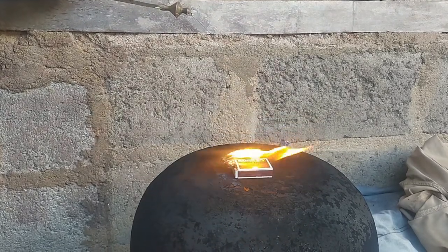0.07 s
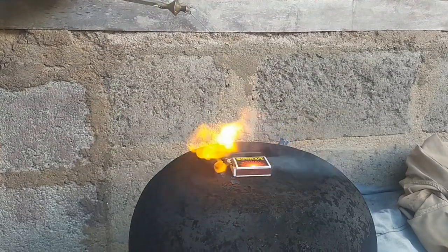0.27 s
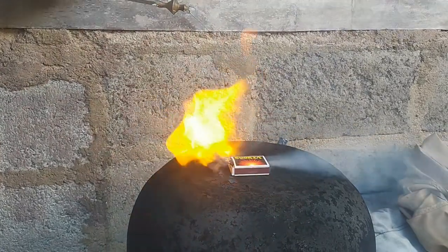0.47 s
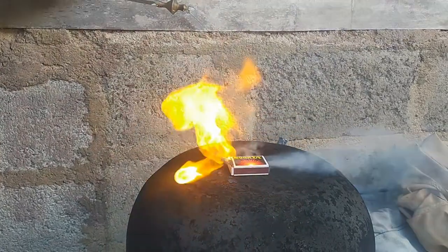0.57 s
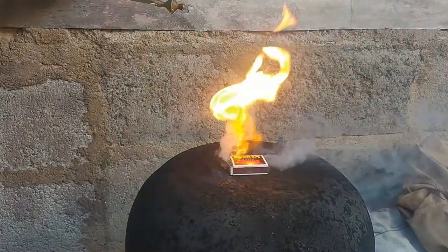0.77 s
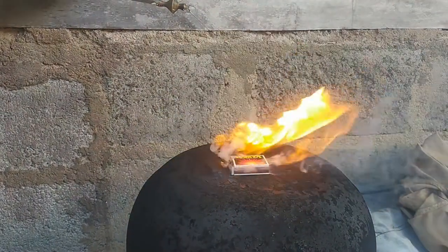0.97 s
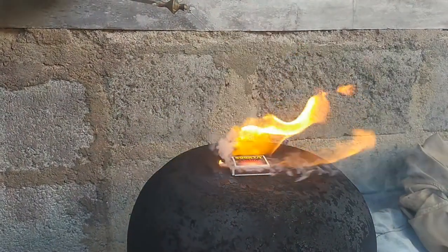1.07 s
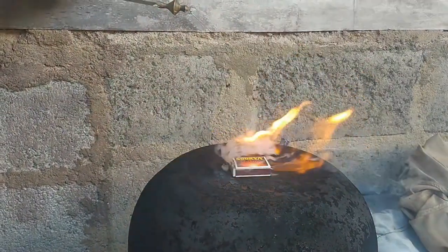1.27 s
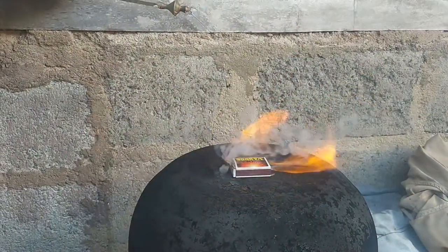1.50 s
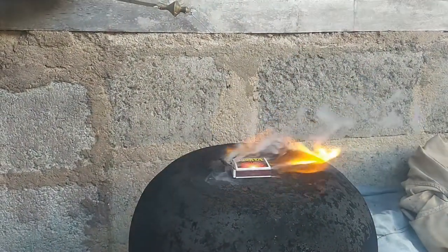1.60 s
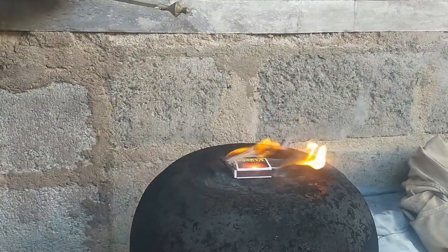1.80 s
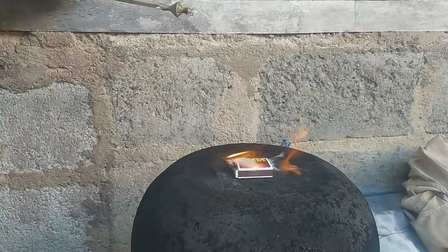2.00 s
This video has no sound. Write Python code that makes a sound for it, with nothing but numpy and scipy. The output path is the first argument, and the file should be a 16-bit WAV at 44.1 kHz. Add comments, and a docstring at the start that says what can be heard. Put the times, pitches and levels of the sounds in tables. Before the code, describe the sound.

A box of matches flares up with a hissing whoosh, then sputters and dies down.

```python
"""Outdoors, a box of matches flares up on an iron dome, close in front of a block wall.
A two-port stereo microphone hears the heads catch in a swelling hiss and rasp, hollowed by the
wall's quick echo. Near 0.4 s a jet of gas bursts out with a low roar of flame. From 1.4 s the
last heads sputter and spit as the fire sinks, and faint hums swell briefly in the distance."""
import sys
import numpy as np
from scipy import signal
from scipy.fft import rfft, irfft, next_fast_len
from scipy.io import wavfile
from scipy.ndimage import map_coordinates

SR = 44100
rng = np.random.default_rng(int(sys.argv[2]) if len(sys.argv) > 2 else 0)


def dump_mix(stems):
    """Bounce the given channels to the path in sys.argv[1] as a 16-bit WAV at rate SR."""
    frames = np.atleast_2d(stems).T  # one column per channel
    limited = np.clip(frames, -1, 1)  # hard clip at full scale
    pcm = np.round(limited * 32767).astype(np.int16)
    wavfile.write(sys.argv[1], SR, pcm)


N = 90404

# colour of match heads catching, in sputter and spits: frequency_hz, gain_db
HEAD_SPECTRUM = [(300, -45), (550, -14), (900, -9.5), (1350, -7.5), (1900, -4), (2250, -2), (2500, 1.5),
                 (2800, -4), (3050, -3.5), (3700, -3), (4300, 3), (5000, -2), (5700, 1), (6500, -3.5),
                 (9000, -10), (14000, -47)]
HEAD_WALL_GAIN = 0.33


def amp(db):
    """Decibels to gain."""
    return 10 ** (np.asarray(db) / 20)


def unit(x):
    """Scaled to rms 1."""
    return x / np.sqrt(np.mean(x ** 2) + 1e-20)


def along(points, hz):
    """Rows of frequency_hz, value, read at hz on a log axis."""
    frequencies, values = np.transpose(points)
    return np.interp(np.log(hz + 1), np.log(frequencies + 1), values)


def curve(rows):
    """Rows of time_s, value, as one value per sample."""
    return np.interp(np.arange(N) / SR, *np.transpose(rows))


def wobble(rate):
    """A smooth random curve, rate knots a second."""
    return map_coordinates(rng.standard_normal(4096), [np.arange(N) * rate / SR], mode="wrap")


def filtered(x, response):
    """x through a complex response, given as a function of Hz."""
    size = next_fast_len(N + SR // 2)
    return irfft(rfft(x, size) * response(np.fft.rfftfreq(size, 1 / SR)), size)[..., :N]


def swept(x, centre, gain_db):
    """A moving filter, gain_db of the offset in Hz from a gliding centre; the mono mix has rms 1."""
    hz, t, frames = signal.stft(x, SR, nperseg=512)
    offset = hz[:, None] - np.interp(t, *np.transpose(centre))
    pair = signal.istft(frames * amp(gain_db(offset)), SR, nperseg=512)[1][:, :N]
    return pair / pair.mean(axis=0).std()


def turbulence():
    """Two unrelated white noises."""
    return rng.standard_normal((2, N))


def crackle(rate, share):
    """Turbulence with tiny pops, rate a second, that carry a share of its power."""
    pops = (rng.random(N) < rate / SR) * rng.standard_normal((2, N))
    return np.sqrt(share) * unit(pops) + np.sqrt(1 - share) * turbulence()


def at_microphone(drive, spectrum, wall_gain=0):
    """Noise coloured, joined by the wall's echo and spread over both ports; the mono mix has rms 1."""
    # how alike the two ports sound: frequency_hz, coherence
    likeness = [(30, 0.43), (70, 1), (150, 0.98), (550, 0.95), (1000, 0.74), (2500, 0.94), (4100, 1),
                (4800, 0.43), (8000, 0.55), (10000, 0.19), (14000, 0.077)]
    # level between the ports: frequency_hz, left_minus_right_db
    balance = [(100, -0.5), (800, -0.5), (1300, -4), (1900, -6), (2550, -9.5), (3050, -11.5), (3600, 2),
               (4300, -2.5), (5100, -10), (5600, -15), (6200, 4), (6900, -9), (7700, -12), (8500, -14.5),
               (9300, -19), (9900, -7), (10600, -2), (12000, -2), (12700, -4), (15000, 1)]
    # phase between the ports: frequency_hz, left_lead_rad
    lead = [(100, 0.26), (500, 0.18), (1200, 0.5), (2400, -1.8), (3200, 1.2), (4500, -1.6), (5500, 1),
            (7200, -2.5), (8500, -1.7), (9800, 4), (11500, 3.5)]
    wall_delay_s, wall_dull_hz = 0.0015956, 6860
    half = np.array([[.5], [-.5]])

    def mid_and_side(hz):
        bounce = wall_gain / (1 + (hz / wall_dull_hz) ** 6)  # rough blocks scatter the treble
        echo = 1 + bounce * np.exp(-2j * np.pi * hz * wall_delay_s)
        spread = np.arccos(np.clip(along(likeness, hz), -1, 1)) / 2
        return amp(along(spectrum, hz)) * echo * np.array([np.cos(spread), np.sin(spread)])

    def ports(hz):
        return amp(half * along(balance, hz)) * np.exp(1j * half * along(lead, hz))

    mid, side = filtered(drive, mid_and_side)
    pair = filtered(np.array([mid + side, mid - side]), ports)
    return pair / pair.mean(axis=0).std()


def yard(x, share=0.42, span_s=.022):
    """Adds weak early reflections from small things nearby, which return little bass."""
    delays_s = rng.uniform(.004, span_s, size=12)
    gains = unit(rng.standard_normal(size=12))
    taps = np.bincount((delays_s * SR).astype(int), gains / np.sqrt(len(gains)))
    treble = filtered(x, lambda hz: hz / np.hypot(hz, 1110))
    return x + share * signal.fftconvolve(treble, taps)[:N]


def air():
    """Quiet outdoor air around the microphone."""
    # colour of the background: frequency_hz, gain_db
    spectrum = [(20, 12.5), (60, -5), (200, -8), (400, -4.5), (700, -1), (1100, -2), (1600, -29),
                (2600, -6), (4200, -8.5), (6500, -10.5), (9500, -7), (12500, -5.5), (15500, -31)]
    return amp(-56) * at_microphone(turbulence(), spectrum)


def hums():
    """Faint, unsteady tones far off that swell briefly at the end."""
    # distant tones: middle_s, length_s, pitch_hz, level_db
    tones = [(1.98, 0.1, 388, -56.5), (1.98, .09, 506, -58), (2.4, 0.11, 280, -52.5),
             (2.0, 0.058, 1090, -61)]
    t, sound = np.arange(N) / SR, np.zeros(N)
    for middle_s, length_s, pitch_hz, level_db in tones:
        swell = np.exp(-(2 * (t - middle_s) / length_s) ** 2)
        sound += amp(level_db) * swell * np.sin(2 * np.pi * pitch_hz * t + 0.93 * wobble(29.45))
    return sound


def rumble():
    """The deep flapping of the flame while it stands tall."""
    # rise and fall of the flapping: time_s, level_db
    levels = [(0, -65), (.38, -60.5), (.45, -49), (.68, -48), (.77, -60), (.95, -56.5), (1.1, -55.5),
              (1.35, -64), (2.05, -62.5)]
    # its deep colour: frequency_hz, gain_db
    spectrum = [(20, 4.5), (45, -2), (85, 1.5), (130, -6), (300, -62), (1000, -70)]
    return amp(curve(levels) + 2.2 * wobble(25.5)) * at_microphone(turbulence(), spectrum)


def whoosh():
    """The low, fluttering body of the flame, heaviest as the fireball lifts."""
    # surges of the flame: time_s, level_db
    levels = [(0, -62), (.12, -61), (.19, -55), (.225, -45), (.3, -52.5), (.33, -55), (.41, -44.5),
              (.435, -36), (.54, -35.5), (.615, -32), (.71, -40.5), (.75, -49.5), (.81, -51.5), (.9, -47.5),
              (1.17, -52.5), (1.26, -49), (1.32, -60), (1.43, -55), (1.85, -61), (2.05, -56)]
    # their low colour: frequency_hz, gain_db
    spectrum = [(40, -25), (100, -12.5), (135, -4.5), (178, 2.5), (218, 0), (255, -7.5), (300, -4),
                (380, -15), (700, -30)]
    return amp(curve(levels) + 0.69 * wobble(39.74)) * at_microphone(turbulence(), spectrum)


def roar():
    """The throaty roar of the flame, strongest as the gas bursts out."""
    # course of the roar: time_s, relative_db
    levels = [(0, -61), (.04, -52), (.08, -58), (.18, -53.5), (.21, -42.5), (.31, -48.5), (.405, -42),
              (.435, -30.5), (.56, -31), (.66, -36), (.8, -44.5), (1.1, -47.5), (1.26, -46.5), (1.34, -55),
              (1.44, -47.5), (1.52, -51), (1.62, -47.5), (1.9, -62), (2.05, -56.5)]
    # its throaty colour: frequency_hz, gain_db
    spectrum = [(100, -48), (380, -13), (500, 0), (670, -2), (790, -10.5), (1400, -13.5), (3000, -33.5)]
    return amp(curve(levels) - 3.5 + 0.47 * wobble(44.4)) * at_microphone(turbulence(), spectrum)


def jet():
    """At the height of the flare, gas shoots from the end of the box in a broad rush."""
    # colour of the rushing gas: frequency_hz, gain_db
    spectrum = [(600, -28), (1200, -2.5), (2100, 5), (3100, 2), (3800, -7), (4600, -8.5), (5400, -4),
                (6300, -2), (7300, 2), (8300, -17), (9400, 7), (10400, -24), (11400, -6), (12100, -9.5),
                (13100, -11), (14200, -38), (15500, -54)]
    start_s, rise_s, hold_s, fade_db_per_s = 0.29, .11, 0.24, 65
    age = np.arange(N) / SR - start_s
    rise = np.clip(age / rise_s, 0, 1) ** 2
    fade_db = fade_db_per_s * np.maximum(age - rise_s - hold_s, 0)
    level_db = -30.5 - fade_db + 1.2 * wobble(58.2)
    return rise * amp(level_db) * at_microphone(turbulence(), spectrum, wall_gain=0.057)


def hollowed(x):
    """Narrow dips in the treble that make the burning heads sound hollow."""
    # notches: centre_hz, width_hz, depth_db
    dips = [(3470, 110, 7), (4000, 65, 40), (4580, 130, 8), (6970, 54, 4)]

    def response(hz):
        cut_db = sum(depth * np.exp(-((hz - centre) / width) ** 2) for centre, width, depth in dips)
        return amp(-cut_db)

    return filtered(x, response)


def box_muffle(x):
    """Turns the treble down above an edge that opens as the box burns through."""
    # upper edge of the sputter: time_s, edge_hz
    edge = [(0, 2510), (.33, 2900), (.38, 3160), (.42, 3200), (.65, 3270), (1.1, 3480), (1.35, 3680),
            (1.65, 3840), (2.05, 3520)]

    def gain_db(offset_hz):
        step_db = 14.5 * (.5 + .5 * np.tanh(offset_hz / 226))
        trough_db = 5.5 * np.exp(-((offset_hz - 750) / 270) ** 2)  # a dark band just past the edge
        return -step_db - trough_db

    return swept(x, edge, gain_db)


def spits(attack_s=.001, decay_s=.0075):
    """Single heads go off in short puffs, with the colour of the sputter."""
    # heads going off: start_s, relative_db
    heads = [(0.3287, -20), (1.4027, -23), (1.4456, -18), (1.481, -18), (1.5074, -35), (1.571, -26),
             (1.6122, -23), (1.6605, -30), (1.693, -19.5), (1.715, -26), (1.7534, -20), (1.7884, -23.5),
             (1.8401, -20.5)]
    t, puffs = np.arange(N) / SR, np.zeros(N)
    for start_s, relative_db in heads:
        age = np.maximum(t - start_s, 0)
        puffs += amp(relative_db - 15) * (1 - np.exp(-age / attack_s)) * np.exp(-age / decay_s)
    return puffs * box_muffle(at_microphone(turbulence(), HEAD_SPECTRUM, HEAD_WALL_GAIN))


def sputter():
    """The rasp of the heads catching one after another inside the box."""
    # course of the rasp: time_s, relative_db
    levels = [(0.0, -47.5), (0.08, -51.5), (0.14, -43), (0.27, -35), (0.32, -30), (0.335, -29), (0.64, -32),
              (0.81, -33), (0.84, -35.5), (0.96, -36.5), (1.08, -40), (1.19, -36), (1.22, -33), (1.3, -37),
              (1.325, -41.5), (1.36, -36), (1.41, -33.5), (1.5, -35.5), (1.555, -37), (1.58, -33),
              (1.64, -35), (1.68, -33), (1.75, -38.5), (1.9, -46.5), (2.05, -54.5)]
    level_db = curve(levels) - 2 + 1.03 * wobble(130) + 0.59 * wobble(24.63)
    rasp = at_microphone(crackle(rate=2200, share=0.23), HEAD_SPECTRUM, HEAD_WALL_GAIN)
    return amp(level_db) * box_muffle(rasp)


def hiss(sizzle_db=5.5, sizzle_width_hz=690):
    """Gas fizzes out of the burning heads, with a bright sizzle that sinks as the box opens."""
    # swell and fall of the fizz: time_s, relative_db
    levels = [(0.0, -45.5), (0.08, -53.5), (0.27, -37.5), (0.37, -34.5), (0.42, -27.5), (0.64, -27.5),
              (0.8, -35.5), (0.97, -41.5), (1.27, -35.5), (1.35, -41.5), (1.41, -38.5), (1.45, -44),
              (1.7, -39.5), (1.93, -50), (2.05, -54)]
    # its bright colour: frequency_hz, gain_db
    spectrum = [(3500, -46), (4800, -23), (5600, -15.5), (6500, -42), (7100, -9.5), (7900, -1.5),
                (8700, -4), (9200, -3.5), (9700, 1), (10300, -1.5), (11200, -5.5), (12000, -18.5),
                (13300, -21), (15500, -55)]
    # path of the sizzling peak: time_s, centre_hz
    sizzle = [(0, 10200), (.42, 10450), (.58, 9170), (.75, 8700), (1.25, 9160), (1.65, 8630), (2.05, 8600)]
    level_db = curve(levels) - 1 + 1.18 * wobble(110)
    fizz = at_microphone(crackle(rate=3700, share=0.14), spectrum, wall_gain=0.51)
    sizzling = swept(fizz, sizzle, lambda offset: sizzle_db * np.exp(-(offset / sizzle_width_hz) ** 2))
    return amp(level_db) * sizzling


def scene():
    """The fire in its yard, over the distant background."""
    heads = hollowed(sputter() + spits() + hiss())
    fire = heads + jet() + roar() + rumble() + whoosh()
    return np.array([yard(port) for port in fire]) + air() + hums()


def record(dry):
    """The microphone's channel passes nothing above its band limit."""
    top_hz = 15700
    return filtered(dry, lambda hz: hz < top_hz)


dry = scene()
out = record(dry)
dump_mix(out)
```